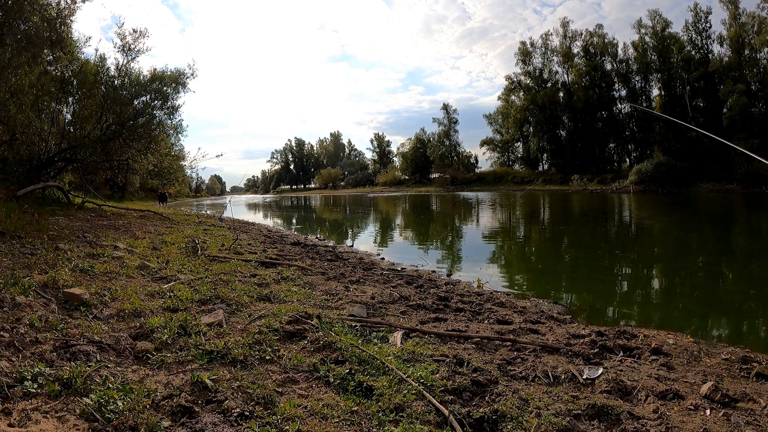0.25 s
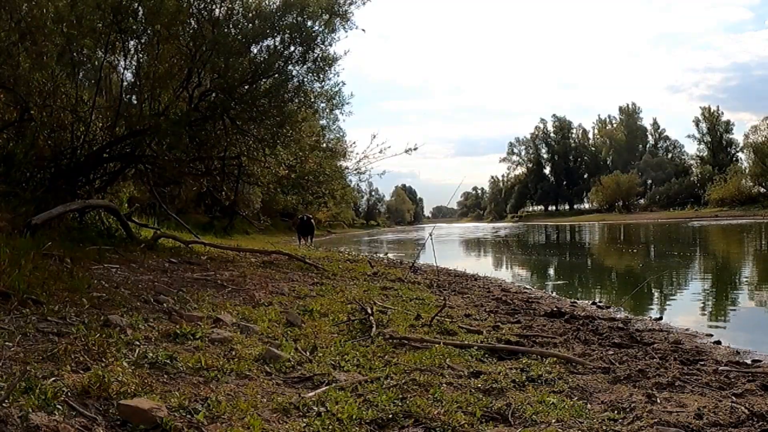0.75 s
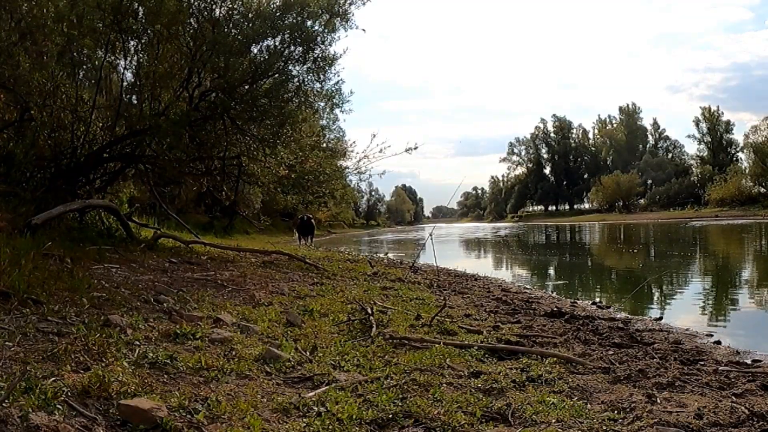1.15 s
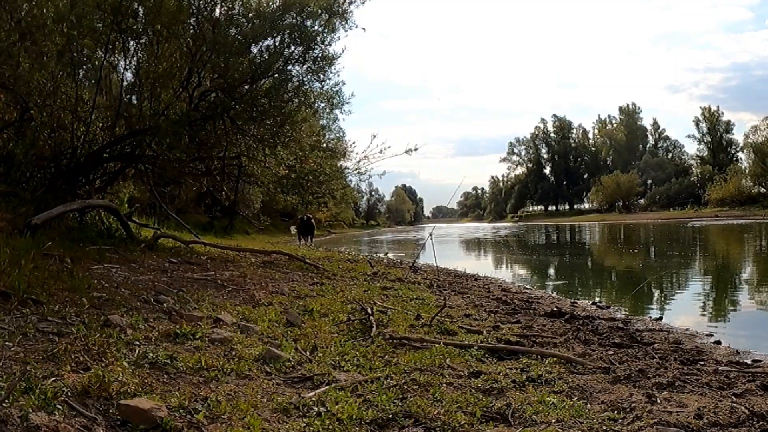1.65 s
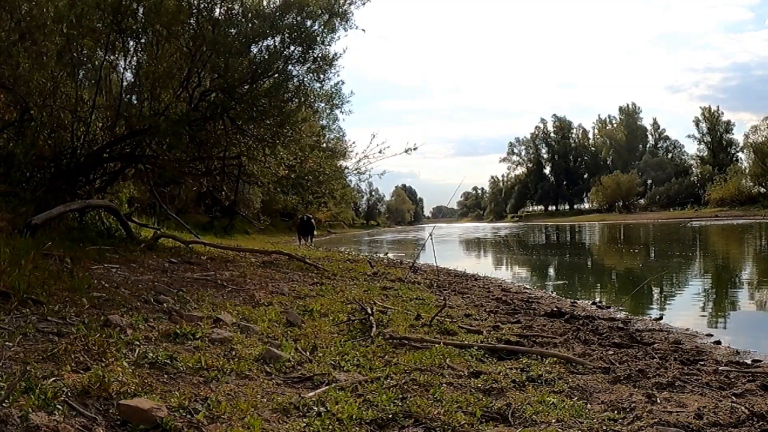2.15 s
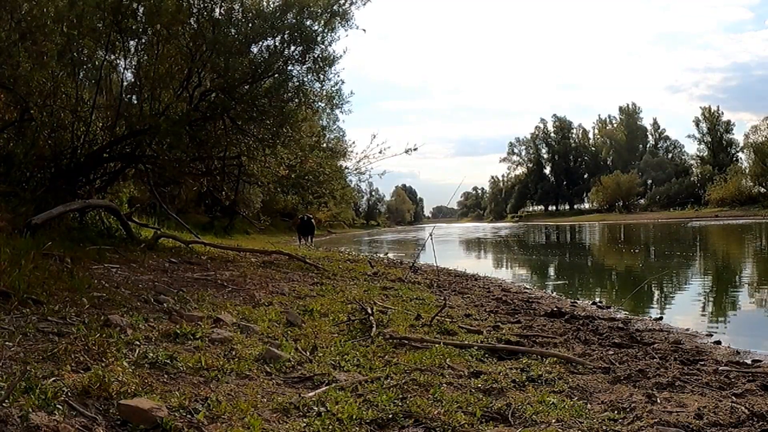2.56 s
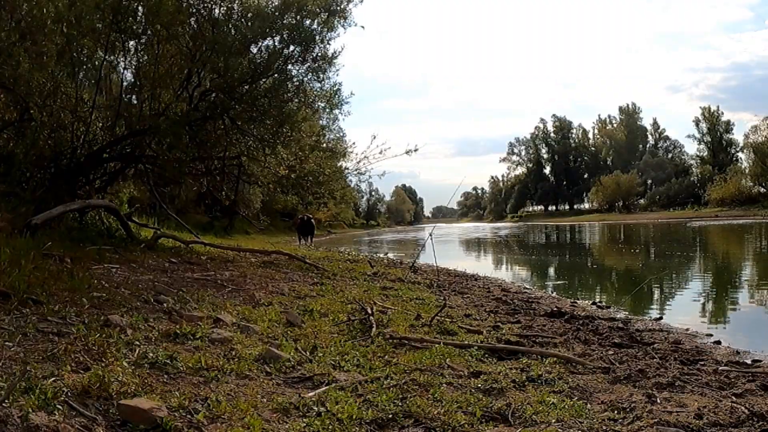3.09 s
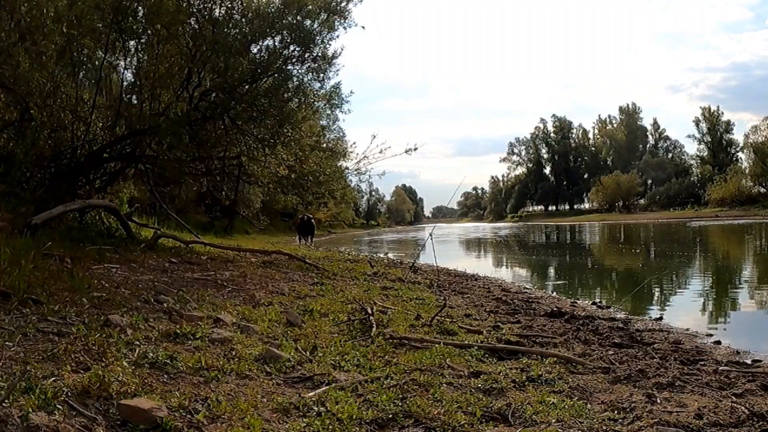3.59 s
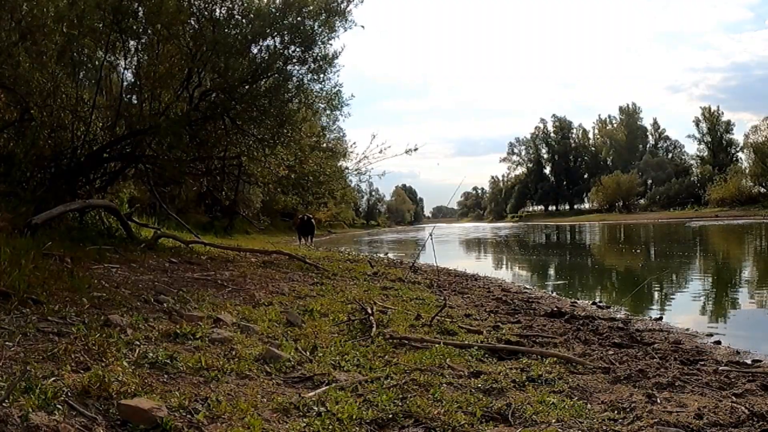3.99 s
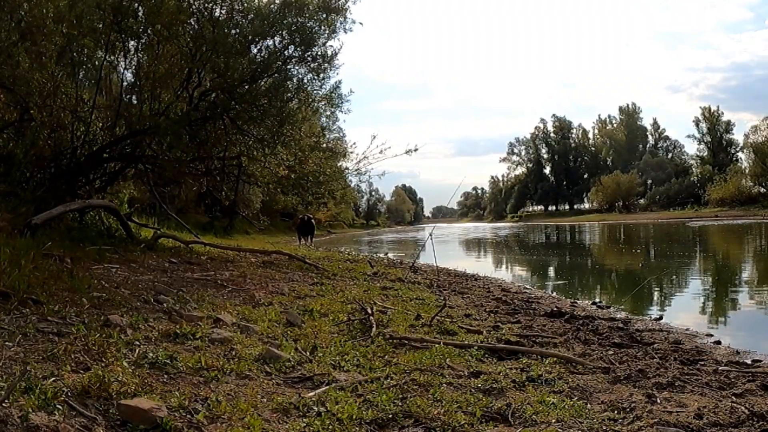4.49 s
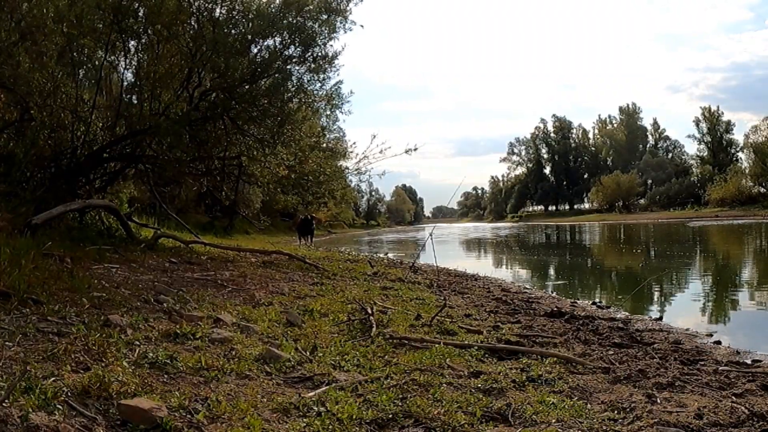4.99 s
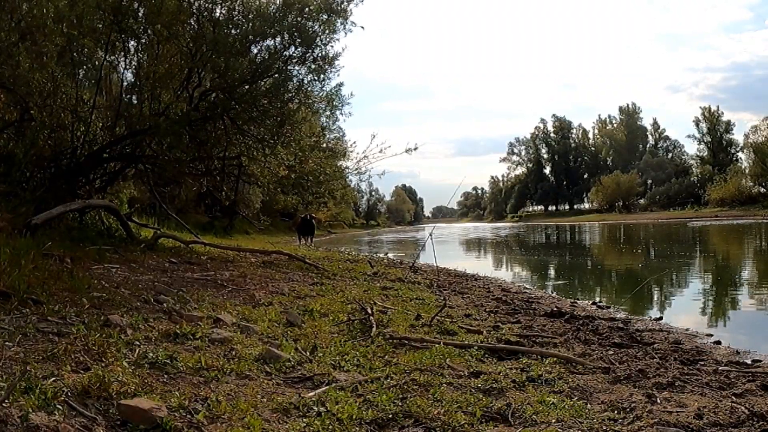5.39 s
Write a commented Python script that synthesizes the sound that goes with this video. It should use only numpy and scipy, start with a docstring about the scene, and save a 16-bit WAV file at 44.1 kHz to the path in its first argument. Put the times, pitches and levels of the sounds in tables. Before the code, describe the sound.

Outdoor stereo ambience with low wind rumble on the microphone and faint tree hiss. A bull some way off finishes a short growling low, then after a pause gives a longer, rougher one. Between and around them a jay screeches from the trees to the right, and quick, high two-toned chirps come and go. Tiny water plips and late dry twig ticks sit underneath, with light woodland echo.

```python
"""A bull's low is already under way, some way off on a wooded river bank; a second, longer one follows.
Each is a pulsing growl of flutter partials that gives way to a clearer, falling note.
A jay screeches four times in the trees, as pulsed noise through a throat; small birds chirp with two
gliding whistles at once, thinner calls and twitter come from farther off, and faint tones are held.
Wind rumbles on the microphone, leaves hiss as shaped noise, twigs tick and tiny bubbles plip."""
import sys
import numpy as np
from scipy import signal
from scipy.fft import rfft, irfft, next_fast_len
from scipy.io import wavfile
from scipy.ndimage import uniform_filter1d, map_coordinates

SR = 44100
rng = np.random.default_rng(int(sys.argv[2]) if len(sys.argv) > 2 else 0)


def store_wav(level_fs):
    """Save 16-bit WAV to argv[1]."""
    pcm = np.round(np.clip(np.atleast_2d(level_fs), -1, 1) * 32767)
    wavfile.write(sys.argv[1], SR, pcm.T.astype(np.int16))


N = 248856
TIME = np.arange(N) / SR  # seconds


def bull():
    """The folds sing a note; a flutter at a quarter of its pitch adds the growl, which weakens late in each low."""
    # The lows. Each row: start in seconds, time the growl starts to fade in seconds, time it breaks off in
    # seconds, end in seconds, growl level in dB, clear note level in dB, octave relative to the note in dB.
    lows = [(-0.25, 0.038, 0.302, 0.565, -24.5, -35.5, -18.5), (2.555, 3.439, 3.9, 4.03, -24.5, -33, -26.5)]
    # Chest partials. Each row: multiple of the flutter rate, level relative to the growl in dB.
    chest = [(1, -18), (2, -8.5), (3, 0)]
    # Throat partials, one list per low. Each row: multiple of the flutter rate, relative level in dB.
    throat_partials = [
        [(5, -5), (6, -7.5), (7, -5), (13, -42)],
        [(5, -2), (6, -12), (7, -9.5), (13, -36), (21, -38.5), (22, -38.5)],
    ]
    # Where the growl cracks, surges or falters. Each row: centre in seconds, half length in seconds,
    # added roughness, flutter lift in Hz, growl change in dB.
    cracks = [(0.17, 0.036, 0.5, 0, -7), (2.58, 0.12, 0.7, -0.5, 1.5), (2.77, 0.07, 0.37, 0.3, 2),
              (2.94, 0.05, 0.1, 0, -4), (3.19, 0.03, 0.6, 2.5, 0), (3.29, 0.05, 0.5, 1.57, 0.5),
              (3.73, 0.022, 0.15, -1.5, -11)]
    # Spectrum of the rasp. Each row: frequency in Hz, relative level in dB per Hz.
    rasp_spectrum = [(70, -33), (160, -3.5), (330, -2), (470, -17.5), (560, -31), (650, -25.5), (850, -43),
                     (1050, -26.5), (1400, -32), (2200, -80)]
    # Spectrum of the bull's breath. Each row: frequency in Hz, relative level in dB per Hz.
    breath_spectrum = [(350, -8), (480, 2), (650, -2), (830, -9.5), (1050, 2), (1400, -5), (2000, -7.5),
                       (3000, -22), (6000, -44.5)]
    growl_attack_s, growl_onset_db = 0.066, -37.5  # the growl swells from this far down
    note_attack_s, note_onset_db = 0.16, -13.5  # the note swells more slowly
    fade_db_per_s, break_db, break_s = 21, -10.5, 0.0095  # the growl tires, then gives way to the note
    note_freed_db = 2.5  # the note gains once the growl gives way
    throat_db, throat_follows = -12.5, 0.61  # upper partials under the growl; share of its swings they follow
    throat_opens_s, throat_closed_db = 0.25, -5.5  # the upper partials come in late
    flutter_hz, sag_hz, sag_s = 50.23, 6.3, 0.115  # the flutter slows as the breath runs out
    steady_rough = 0.23  # roughness between cracks
    drift, jitter = 0.004, 0.017  # slow and rough unsteadiness of the flutter rate, as fractions
    wander_db, shimmer_db = 0.57, 3.5  # slow and rough unsteadiness of each partial's level
    rasp_db, breath_db, wet_db = -11, -39, -23

    voice, breath = np.zeros(N), np.zeros(N)
    crack_rough, lift_hz, dip_db = swells(cracks)
    rough = steady_rough + crack_rough
    for low_row, upper in zip(lows, throat_partials):
        start, tires, breaks, end, full_db, clear_db, octave_db = low_row
        broken = (1 + np.tanh((TIME - breaks) / break_s)) / 2
        effort_db = growl_onset_db * dying(TIME - start, growl_attack_s)
        effort_db -= fade_db_per_s * np.maximum(TIME - tires, 0)
        effort_db += break_db * broken
        growl_db = full_db + effort_db + dip_db
        upper_db = full_db + throat_db + throat_follows * effort_db
        upper_db += throat_closed_db * dying(TIME - start, throat_opens_s)
        note_db = clear_db + note_onset_db * dying(TIME - start, note_attack_s) + note_freed_db * broken

        rate = flutter_hz + lift_hz - sag_hz * dying(end - TIME, sag_s)
        unsteady = 1 + drift * wobble(7) + jitter * rough * wobble(45)
        flutter = 2 * np.pi * np.cumsum(rate * unsteady) / SR

        # the octave is held down where the growl covers the note
        clear = 1 / (1 + amp(growl_db - note_db) ** 2)
        partials = [(4, note_db), (8, note_db + octave_db - 9 * (1 - clear))]
        partials += [(k, growl_db + db) for k, db in chest]
        partials += [(k, upper_db + db) for k, db in upper]
        low = np.zeros(N)
        for k, db in partials:
            level = amp(db + wander_db * wobble(7) + shimmer_db * rough * wobble(30))
            low += level * np.sin(round(k) * flutter + rng.uniform(0, 2 * np.pi))

        # air escapes once a flutter and roughens the voice
        rasp = coloured(rng.standard_normal(N) * (1 + np.cos(flutter)), rasp_spectrum)
        sounding = gate(start, end, 0.0078)
        voice += sounding * (np.sqrt(2) * low + rough * amp(note_db + rasp_db) * rasp)
        breath += sounding * amp(full_db + breath_db + throat_follows * effort_db)
    return panned(voice, 0.2) + breath * rush(breath_spectrum) + amp(wet_db) * echo(voice, side_db=-16.5)


def jay():
    """Uneven puffs of turbulence, about two hundred a second, ring the throat."""
    # The screeches. Each row: start in seconds, length in seconds, relative level in dB, attack in seconds,
    # first pulse rate in Hz, how distinct the pulses are, time the beak takes to open in seconds.
    screeches = [(0.323, 0.2, -45, 0.064, 220, 0.49, 0.004), (0.689, 0.23, -48.5, 0.017, 212, 0.36, 0.044),
                 (1.738, 0.18, -43.5, 0.018, 236, 0.14, 0.019), (2.146, 0.22, -51, 0.038, 220, 0.24, 0.014)]
    # The throat, one list per screech. Each row: frequency in Hz, relative level in dB per Hz.
    throats = [
        [(530, -51), (900, -31), (1020, -13), (1120, -19.5), (1260, -14), (1380, -19.5), (1580, -12),
         (2380, -8), (2600, -4), (3530, -11.5), (4520, -5.5), (4860, -11.5), (5580, -24), (6140, -17.5),
         (7980, -37.5), (13500, -120)],
        [(530, -73), (900, -37), (952, -33), (1020, -30), (1120, -13), (1280, -11), (1410, 1), (1800, -6),
         (2290, 0), (2500, -2), (3530, -0.5), (4350, 2.5), (5020, -11), (6140, -11), (7980, -27), (13500, -120)],
        [(530, -59), (900, -28.5), (1180, -17), (1280, -18), (1380, -9.5), (1490, -12), (1620, -6.5), (2040, 1),
         (2380, -5), (2560, -14), (2750, -7), (2980, -5.5), (4450, -2), (6140, -20), (7980, -33), (13500, -120)],
        [(530, -55.5), (900, -20), (937, -27.5), (1030, -16), (1310, -11), (1510, -4), (1950, -8.5),
         (2090, -0.5), (2380, -3.5), (2600, -1.5), (3310, -5), (4380, -6.5), (5580, -16.5), (6140, -17),
         (7980, -32), (13500, -120)],
    ]
    onset_db, sag_hz_per_s = -26.5, 180  # each swells from this far down while its pulses slow
    end_db, release_s = -4, 0.016  # each slackens just before it stops
    jitter = 0.044  # unsteadiness of the pulse rate, as a fraction
    closed_treble_db, closed_bass_db = -24, 13.0  # treble and bass while the beak is shut
    level_db, wet_db = 1.0, -9

    voice = np.zeros(N)
    for (start, length, db, attack, first_hz, puffiness, opening_time), throat in zip(screeches, throats):
        age = TIME - start
        rate = first_hz - sag_hz_per_s * np.clip(age, 0, length)
        phase = 2 * np.pi * np.cumsum(rate * (1 + jitter * wobble(120))) / SR
        puffs = np.exp(puffiness * np.cos(phase)) * amp(0.58 * wobble(150))
        screech = coloured(puffs * rng.standard_normal(N), throat)
        # the call starts low in the throat; the treble comes through as the beak opens
        dull = filtered(screech, lambda hz: 1 / (1 + (hz / 2400) ** 8))
        closed = dying(age, opening_time)
        bass = amp(closed_bass_db * closed + 0.89 * wobble(33)) * dull
        treble = amp(closed_treble_db * closed + 0.28 * wobble(30)) * (screech - dull)
        effort_db = onset_db * dying(age, attack) + end_db * dying(length - age, release_s)
        voice += gate(start, start + length, 0.004) * amp(db + level_db + effort_db) * (bass + treble)
    voice = patchy(voice, depth_db=2.0)  # the throat's resonances shift
    return panned(voice, -5.0) + amp(wet_db) * panned(echo(voice, side_db=-1.5), -2.4)


def small_birds():
    """Two-voiced chirps nearby, one voice per side of the syrinx; thin slurs from deeper in, and faint held tones."""
    # Two-voiced chirps. Each row: start in seconds, length in seconds, lateness of the rise, lower voice's
    # first frequency in Hz, its level in dB, delay of the upper voice in seconds, its top frequency in Hz,
    # its level in dB.
    chirp_rows = [(0.73, 0.035, 0.81, 2726, -48.5, 0.001, 6150, -55.5),
                  (1.165, 0.02, 0.58, 3000, -67, -0.0094, 5620, -56.5),
                  (1.369, 0.042, 0.82, 3340, -57.5, 0.012, 5930, -65),
                  (1.479, 0.026, 0.93, 2900, -55.5, -0.012, 6000, -56.5),
                  (2.49, 0.022, 1, 2960, -50, -0.012, 6020, -53.5),
                  (2.737, 0.032, 0.95, 2740, -68.5, 0.003, 5200, -73),
                  (3.419, 0.044, 0.83, 2630, -54, 0.007, 6150, -49.5),
                  (3.477, 0.029, 0.56, 2400, -49, 0.003, 5440, -48.5),
                  (3.768, 0.034, 0.55, 2344, -49, 0.004, 5980, -50),
                  (3.88, 0.028, 1.4, 2770, -67, -0.0086, 5900, -68),
                  (3.972, 0.035, 1.1, 2720, -65.5, -0.0056, 5900, -71.5),
                  (4.099, 0.032, 0.74, 2360, -53, 0.006, 5490, -51.5),
                  (4.423, 0.029, 0.66, 2490, -50, -0.0023, 5900, -50.5),
                  (4.701, 0.023, 0.91, 2830, -57.5, -0.011, 5760, -58),
                  (5.029, 0.033, 0.7, 3100, -64, -0.0056, 5940, -67),
                  (5.476, 0.03, 0.71, 2390, -51, -0.0019, 5810, -50),
                  (5.527, 0.024, 0.94, 2910, -49.5, -0.011, 6160, -51.5)]
    # Thin calls farther off. Each row: start in seconds, length in seconds, first frequency in Hz,
    # last frequency in Hz, level in dB.
    far_calls = [(0.106, 0.035, 6220, 5350, -64), (2.715, 0.046, 5150, 5020, -64.5),
                 (4.23, 0.062, 6340, 4570, -71), (4.322, 0.032, 5600, 5070, -66.5),
                 (4.942, 0.06, 3990, 4300, -72.5), (4.95, 0.045, 8700, 7940, -75),
                 (5.262, 0.07, 5980, 4730, -68), (5.366, 0.025, 5800, 4900, -70)]
    # Faint held tones. Each row: start in seconds, length in seconds, frequency in Hz, level in dB.
    thin_tones = [(0.0, 0.26, 3125, -76.5), (2.82, 0.55, 3534, -81), (2.901, 0.38, 5680, -76),
                  (3.56, 0.6, 6630, -79)]
    lower_top_hz, upper_rise_hz = 4258, 1528  # the lower voice levels off here; the upper climbs this far
    upper_later, upper_stops_early_s = 0.25, 0.003  # the upper voice rises later and ends this much sooner
    haze_db, wet_db, far_wet_db = -15, -15, -5

    near, far = np.zeros(N), twitter()
    for s, length, lateness, from_hz, lower_db, delay, top_hz, upper_db in chirp_rows:
        lower = whistle(length, from_hz, lower_top_hz, lateness)
        add(near, s, amp(lower_db) * lower)
        upper_length = length - delay - upper_stops_early_s
        upper = whistle(upper_length, top_hz - upper_rise_hz, top_hz, lateness + upper_later)
        add(near, s + delay, amp(upper_db) * upper)
    for s, length, from_hz, to_hz, db in far_calls:
        add(far, s, amp(db) * whistle(length, from_hz, to_hz, 0.72))
    for s, length, hz, db in thin_tones:
        add(far, s, amp(db) * whistle(length, hz, hz, 1))

    # a soft band of noise surrounds each chirp
    loudness = np.sqrt(np.abs(uniform_filter1d(near ** 2, size=1200)))
    haze_spectrum = [(1800, -16), (3000, 1.0), (6000, 3.5), (9500, -11.5), (12500, -25.0)]  # Hz, dB per Hz
    haze = amp(haze_db) * loudness * coloured(rng.standard_normal(N), haze_spectrum)
    chirps = bounced(near + overtones(near)) + haze
    scattered = echo(amp(wet_db) * chirps + haze + amp(far_wet_db) * far, side_db=-1.5)
    return panned(chirps + far, -1.8) + scattered


def whistle(length, from_hz, to_hz, lateness):
    """A slightly trembling sine that swells and glides, levelling off at its end."""
    swell_lateness, tremble_db = 1.06, 1.75  # above 1 the whistle peaks late; its level trembles
    u = np.linspace(0, 1, round(length * SR))
    hz = from_hz + (to_hz - from_hz) * np.sin(np.pi / 2 * u ** lateness) ** 1.5
    waver, tremble = [map_coordinates(knots, [u * 39]) for knots in rng.standard_normal((2, 40))]
    swell = np.sin(np.pi * u ** swell_lateness).clip(0) ** 0.8
    tone = np.sin(2 * np.pi * np.cumsum(hz + 45 * waver) / SR)
    return swell * amp(tremble_db * tremble) * tone


def overtones(x):
    """Two voices mix in the syrinx, giving their octaves and a sum tone."""
    loudness = np.sqrt(np.abs(uniform_filter1d(x ** 2, size=128)))
    mixed = x ** 2 / (loudness + 1e-6)
    response = [(5000, -80), (6800, -19), (9500, -22), (11000, -31), (12500, -42)]  # Hz, dB
    return filtered(mixed, lambda hz: amp(along(response, hz)))


def twitter(spread=0.22, glide=0.15, count=26):
    """A faint flock far off: tiny slurs at random times and pitches, rising or falling."""
    from_s, to_s = 3.0, 6.1
    centre_hz, level_db = 6000, -70.5
    track = np.zeros(N)
    for when, length, pitch, slope in rng.uniform(0, 1, (count, 4)):
        hz = centre_hz * np.exp(spread * (2 * pitch - 1))
        slur = whistle(0.025 * (1 + length), hz, hz * np.exp(glide * (2 * slope - 1)), 1)
        add(track, from_s + when * (to_s - from_s), amp(level_db) * slur)
    return track


def ticks(body_db=-2, snap_db=-5, snap_t60=0.0083):
    """Twigs and pebbles: each tick is a brief noisy snap and a dull, quickly damped ring."""
    # The ticks. Each row: time in seconds, relative ring level in dB, relative snap level in dB,
    # left-right difference in dB.
    tick_rows = [(1.716, -68, -58, -7.5), (4.843, -61, -63, 8), (4.867, -72, -56.5, 0),
                 (5.3151, -49, -48, 5), (5.5176, -42, -65.5, 4.5)]
    # Ring modes. Each row: frequency in Hz, relative level in dB, 60 dB decay time in seconds.
    modes = [(1356, 2, 0.01), (1730, 1, 0.0051), (2440, -9, 0.0067)]
    track, t = np.zeros((2, N)), np.arange(SR // 20) / SR
    for s, db, crack_db, pan_db in tick_rows:
        ring = sum(amp(level - 60 * t / t60) * np.sin(2 * np.pi * hz * t) for hz, level, t60 in modes)
        snap = amp(-60 * t / snap_t60) * rng.standard_normal(len(t))
        add(track, s, panned(amp(db + body_db) * ring + amp(crack_db + snap_db) * snap, pan_db))
    return track


def plips(level_db=-8, spread=0.15, life=0.034, count=14):
    """At the water's edge: each plip is a handful of tiny damped bubbles, scattered in time and pitch."""
    # The plips. Each row: time in seconds, relative level in dB.
    plip_rows = [(0.048, -49.5), (0.2335, -52), (3.1822, -55), (3.383, -51.5), (3.5859, -52.5), (3.82, -53),
                 (4.135, -55)]
    middle_hz = 1904
    track, t = np.zeros(N), np.arange(SR // 20) / SR
    envelope = amp(-60 * t / life) * (1 - np.exp(-t / 0.00014))
    for s, db in plip_rows:
        for delay, size in zip(rng.uniform(-0.008, 0.018, count), rng.standard_normal(count)):
            bubble = np.sin(2 * np.pi * middle_hz * np.exp(spread * size) * t) * envelope
            add(track, s + delay, amp(db + level_db) * bubble)
    return panned(track, 0.3)


def air():
    """Wind on the microphone, the hum of the open land and the trees' soft hiss, each as shaped noise."""
    # Spectra of wind, hum, rustle and leaf hiss. Each row: frequency in Hz, relative level in dB per Hz.
    rumble_spectrum = [(11, -27), (18, -1.5), (37, -2), (65, -9), (85, -8.5), (163, -23), (194, -20.5),
                       (215, -27), (301, -32), (344, -35.5), (496, -47.5), (600, -59.5), (780, -70),
                       (1320, -120)]
    murmur_spectrum = [(200, -26), (350, 2), (500, 0), (700, -5.5), (900, -14.5), (1300, -48.5)]
    tree_spectrum = [(600, -23), (850, -7.5), (1050, 0.5), (1400, -2.5), (2000, -11), (2800, -16.5),
                     (4500, -18.5), (7000, -50.5)]
    leaf_spectrum = [(1500, -24), (2750, -9), (3500, -4.5), (4300, 2.5), (5700, 5.5), (8000, -1.5),
                     (9500, -12), (12000, -28.5), (14000, -43)]
    # Gusts and a lull on the microphone. Each row: centre in seconds, half length in seconds, change in dB.
    gusts = [(0.92, 0.083, -3.5), (1.82, 0.035, 5), (2.3, 0.25, 0.5), (5.25, 0.12, 1.5)]
    # Level of the hum, then of the leaf hiss. Each row: time in seconds, level in dB.
    murmur_level = [(0.0, -63.5), (4.3, -66.5), (4.55, -60), (5.5, -59)]
    leaf_level = [(0.1, -70.5), (1.4, -74), (2.7, -73.5), (3.35, -69), (3.9, -72.5), (4.3, -72), (5.6, -77)]
    wind_db, trees_db = -29, -65.5  # mean levels
    gust_db, = swells(gusts)
    murmur_db, = curves(murmur_level)
    hiss_db, = curves(leaf_level)
    wind = amp(wind_db + gust_db + 0.22 * wobble(11)) * rush(rumble_spectrum)
    murmur = amp(murmur_db + 0.32 * wobble(1.6)) * rush(murmur_spectrum)
    trees = amp(trees_db + 0.8 * wobble(7.2)) * rush(tree_spectrum)
    leaves = amp(hiss_db + 1.3 * wobble(3.9)) * rush(leaf_spectrum)
    return wind + murmur + trees + leaves


def rush(spectrum):
    """Stereo noise of rms 1, nearly mono in the bass."""
    # Likeness of the two channels. Each row: frequency in Hz, left-right correlation.
    likeness = [(25, 0.83), (60, 1), (120, 0.97), (220, 0.98), (420, 0.77), (810, 0.56), (1550, 0.58),
                (3000, 0.15), (5700, 0.52)]

    def mid_and_side(hz):
        turn = np.arccos(np.clip(along(likeness, hz), -1, 1)) / 2
        return amp(along(spectrum, hz)) * [np.cos(turn), np.sin(turn)]

    mid, side = filtered(rng.standard_normal((2, N)), mid_and_side)
    return unit(np.array([mid + side, mid - side]))


def echo(x, side_db):
    """Trunks and leaves scatter a sound back as a diffuse tail, a second of decaying noise."""
    # Decay of the wood's echo. Each row: frequency in Hz, 60 dB decay time in seconds.
    wood = [(150, 1), (1500, 0.54), (4000, 0.56), (9000, 0.26)]
    hz, t, z = signal.stft(rng.standard_normal((2, SR)), SR, nperseg=256)
    decay = amp(-60 * t / along(wood, hz)[:, None])
    build_up = 1 - np.exp(-t / 0.0013)
    tail = signal.istft(z * decay * build_up, SR, nperseg=256)[1]
    tail = tail / np.linalg.norm(tail[0])
    mid, side = signal.fftconvolve(x[None], tail, axes=1)[:, :N]
    return np.array([mid + amp(side_db) * side, mid - amp(side_db) * side])


def bounced(x):
    """Early bounces interfere with the direct sound and ripple its spectrum."""
    # Bounces off the bank and trunks. Each row: delay in seconds, level in dB.
    bounces = [(0.0011, -24.5), (0.0026, -13), (0.0047, -18), (0.0083, -16), (0.015, -15.5)]
    return filtered(x, lambda hz: 1 + sum(amp(db) * np.exp(-2j * np.pi * hz * s) for s, db in bounces))


def patchy(x, depth_db):
    """Let narrow bands of a sound swell and sink on their own."""
    z = signal.stft(x, nperseg=512)[2]
    field = uniform_filter1d(rng.standard_normal(z.shape), size=4, axis=0)
    field = uniform_filter1d(field, size=9, axis=1)
    return signal.istft(z * amp(depth_db * unit(field)), nperseg=512)[1][:N]


def amp(db):
    """Decibels to gain."""
    return 10 ** (np.asarray(db) / 20)


def unit(x):
    """Scale to rms 1."""
    return x / np.sqrt(np.mean(x ** 2) + 1e-20)


def along(points, hz):
    """(Hz, value) points read on a log frequency axis."""
    f, v = np.transpose(points)
    return np.interp(np.log(hz + 1), np.log(f + 1), v)


def curves(rows):
    """One value per sample for each column after the time."""
    s, *cols = np.transpose(rows)
    return [np.interp(TIME, s, c) for c in cols]


def swells(rows):
    """Bell-shaped bumps from rows (s, half length, height, ..): one curve per height column."""
    s, width, *heights = np.transpose(rows)
    return np.array(heights) @ np.exp(-((TIME - s[:, None]) / width[:, None]) ** 2)


def dying(since, life):
    """1 until a moment, then an exponential decay."""
    return np.exp(-np.maximum(since, 0) / life)


def gate(start, end, fade):
    """1 while a call lasts, with soft edges."""
    return np.clip(np.minimum(TIME - start, end - TIME) / fade + 1, 0, 1)


def wobble(rate):
    """A smooth random curve, rate knots a second."""
    return map_coordinates(rng.standard_normal(int(N * rate / SR) + 4), [TIME * rate])


def filtered(x, response):
    """x times a response of frequency."""
    size = next_fast_len(N + SR // 2)
    return irfft(rfft(x, size) * response(np.fft.rfftfreq(size, 1 / SR)), size)[..., :N]


def coloured(x, spectrum):
    """x through a spectrum, at rms 1."""
    return unit(filtered(x, lambda hz: amp(along(spectrum, hz))))


def panned(x, pan_db):
    """Set the level difference between left and right."""
    return x * amp([[pan_db / 2], [-pan_db / 2]])


def add(track, s, sound):
    """Mix a short sound in at time s."""
    part = track[..., max(round(s * SR), 0):][..., :sound.shape[-1]]
    part += sound[..., :part.shape[-1]]


def scene():
    """Everything heard from the bank."""
    return bull() + jay() + small_birds() + ticks() + plips() + air()


def record(dry):
    """The microphone's track keeps nothing above its band limit."""
    top_hz = 12800
    return filtered(dry, lambda hz: hz < top_hz)


dry = scene()
out = record(dry)
store_wav(out)
```